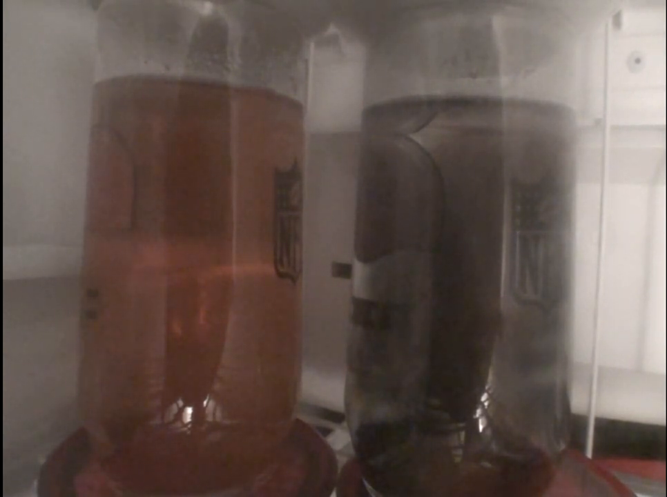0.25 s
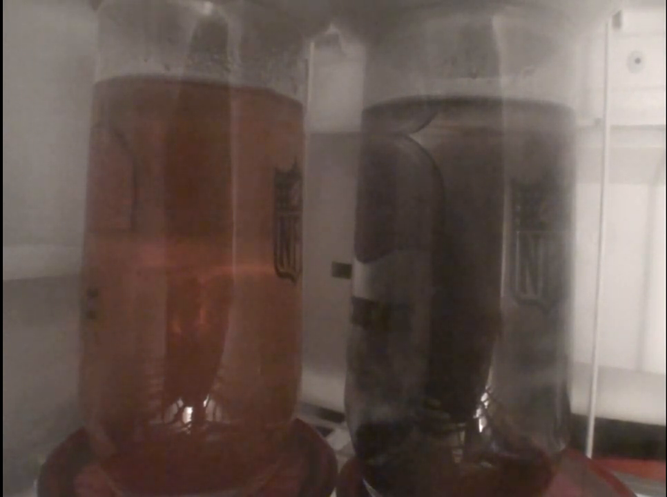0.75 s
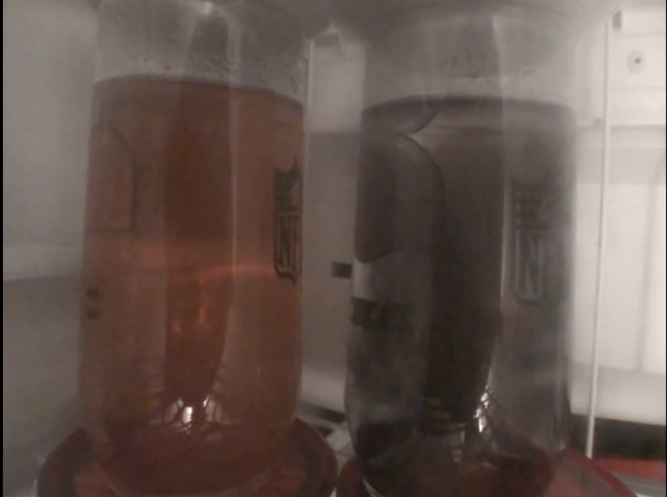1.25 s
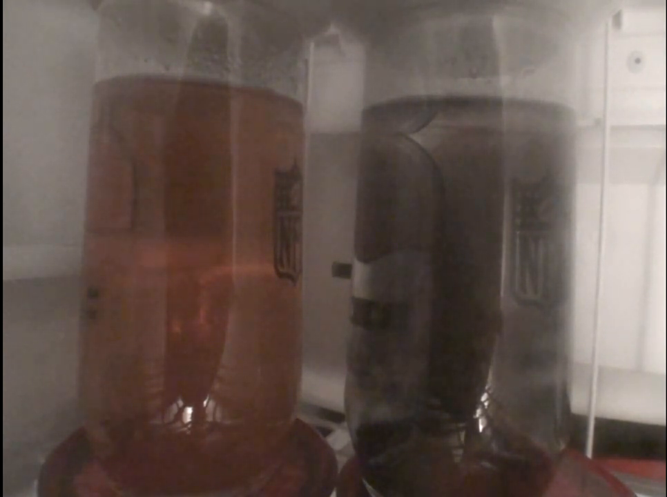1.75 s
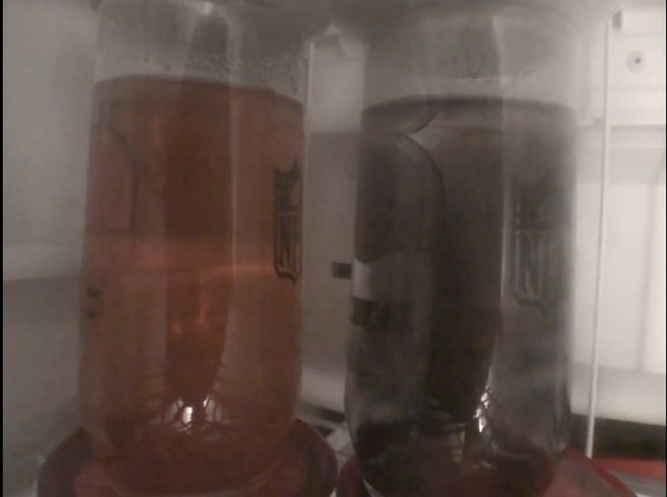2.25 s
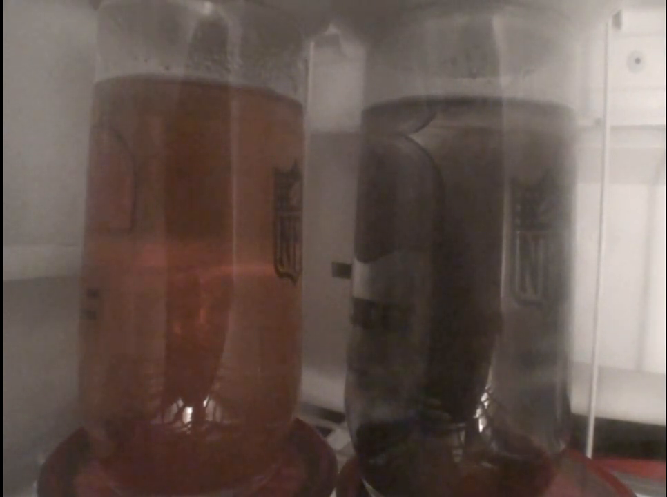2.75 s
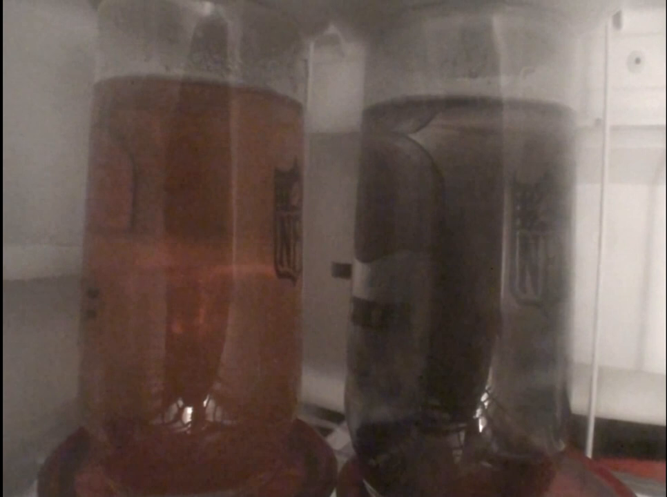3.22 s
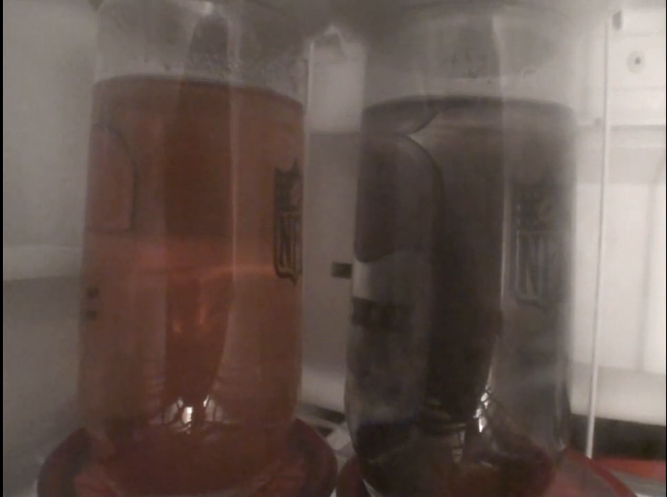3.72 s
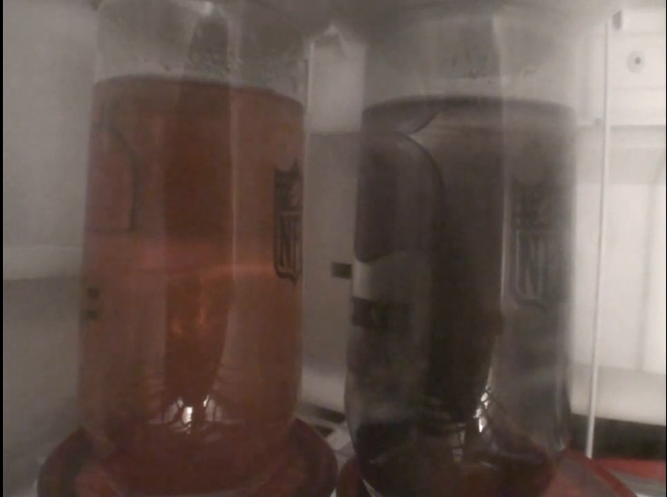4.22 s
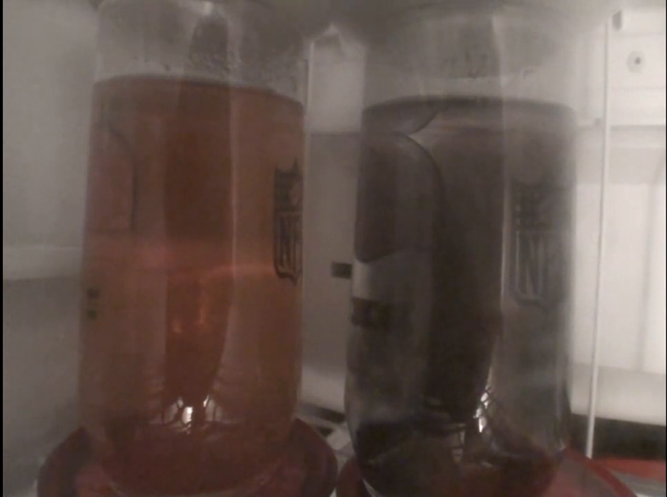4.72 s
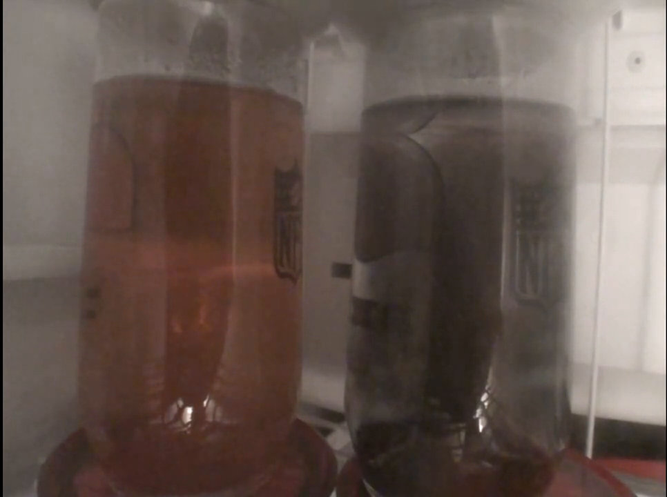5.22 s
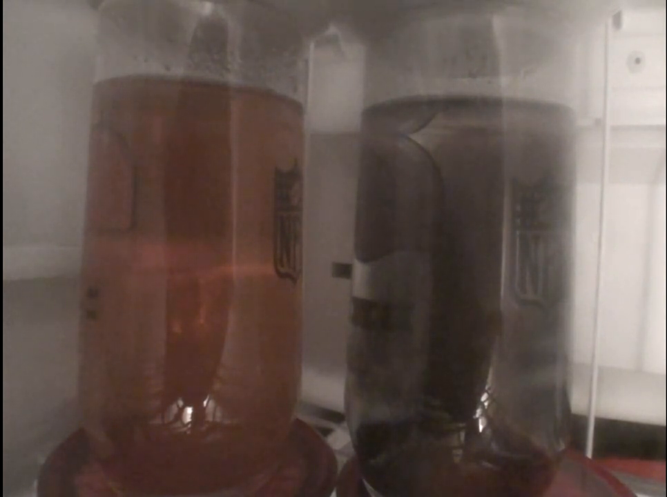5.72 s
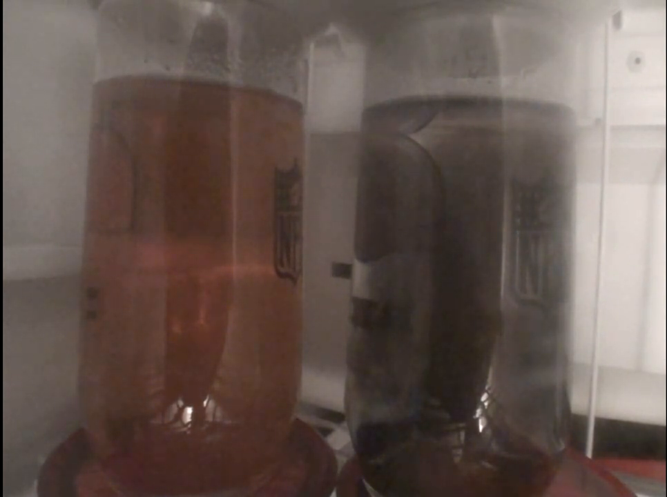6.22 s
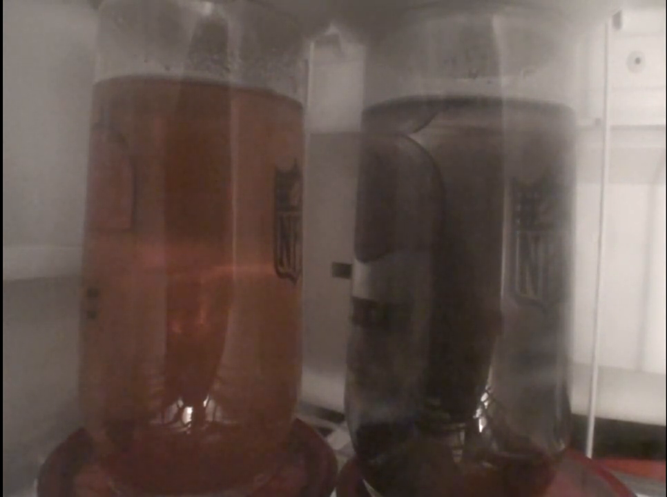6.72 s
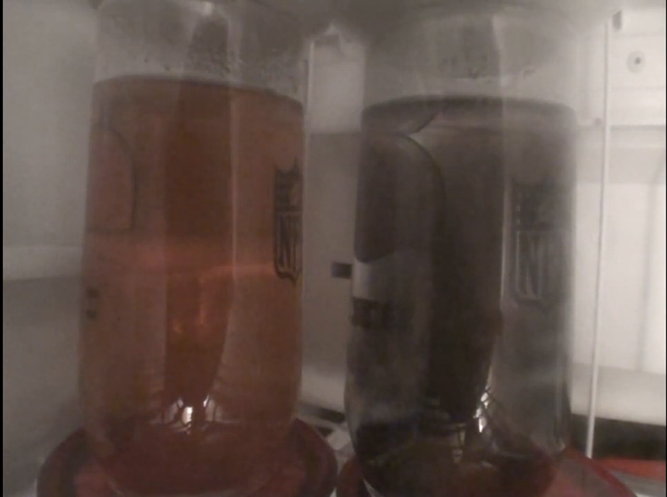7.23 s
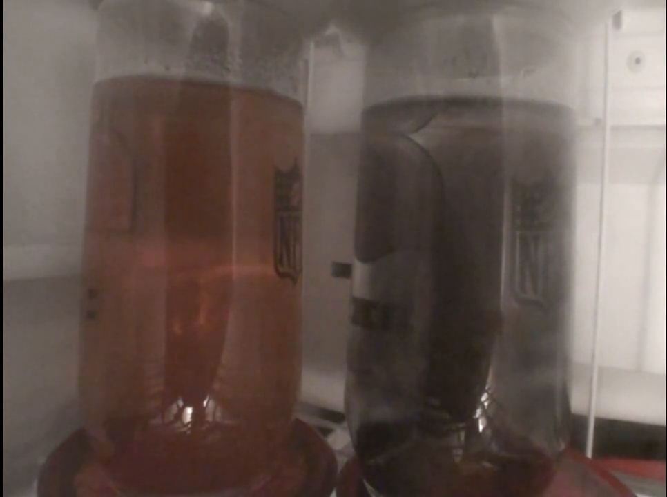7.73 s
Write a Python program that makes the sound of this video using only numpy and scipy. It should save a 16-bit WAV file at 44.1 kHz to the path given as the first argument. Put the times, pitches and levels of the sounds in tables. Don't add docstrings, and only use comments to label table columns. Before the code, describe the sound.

A running freezer heard from inside: a strong low fan hum with a slow throb, over steady rushing air and uneven deep rumble.

```python
import sys
import numpy as np
from scipy import signal
from scipy.fft import rfft, irfft, next_fast_len
from scipy.io import wavfile
from scipy.ndimage import uniform_filter1d

SR = 44100
rng = np.random.default_rng(int(sys.argv[2]) if len(sys.argv) > 2 else 0)


def digitize_waveform(pressure):
    field = np.atleast_2d(pressure).T
    bounded = np.clip(field, -1, 1)
    quanta = np.round(bounded * 32767).astype(np.int16)
    wavfile.write(sys.argv[1], SR, quanta)


def rack_gain(trim_db):
    fader = np.asarray(trim_db, float)
    return 10 ** (fader / 20)


N = 351477
TIME_S = np.arange(N) / SR
COARSE_S = np.arange(0, N + 256, 256) / SR

SHAFT_HZ, BLADES = 49.274, 3
SHAFT_ORDERS = (1, 3, 6, 9, 12)
# left level/dB rms, right level/dB rms, right port lead/rad
FAN_TONES = [(-42, -42.3, -.2), (-16.1, -18.9, 0), (-32, -38.5, .54), (-53, -48, 1.2), (-53, -51, .7)]
PANEL_BEAT_HZ, PANEL_SHARE, PANEL_PEAK_S = .66, .28, .7

MOTOR_HZ = 52.807
# left level/dB rms, right level/dB rms
MOTOR_LEVELS = (-31.7, -32.1)

# f/Hz, level/dB per Hz
AIR_SPECTRUM = [(12, -56.9), (35, -53.0), (60, -46.9), (100, -29.8), (230, -33.9), (330, -50.5),
                (900, -46.6), (1500, -68.0), (2300, -49.7), (2900, -89.5), (4500, -74.4), (6500, -95.8),
                (8800, -112.2), (12800, -119.1)]
# f/Hz, width/Hz, left level/dB, right level/dB
CABINET_MODES = [(13, 7, 0.1, 2.6), (83, 41, -4.7, -5.2), (141, 22, -4.4, -6.4), (168, 16, -6.2, -7.2),
                 (186, 10, -2.4, -1.7), (247, 122, -4.6, -9.1), (285, 19, 3.1, 2.2), (303, 22, 4.3, -3.2),
                 (330, 16, -1.1, 1.5), (400, 27, -2.9, -8.0), (425, 30, -4.9, -3.9), (445, 34, -1.4, 5.0),
                 (508, 94, -8.7, -5.1), (567, 41, -11.0, -3.7), (640, 43, -8.6, -7.3),
                 (734, 50, -2.8, -1.8), (853, 49, -1.7, -2.8), (946, 96, -2.0, -8.9),
                 (1001, 171, -11.4, -2.9), (1090, 58, 5.0, 2.0), (1151, 64, 1.5, -8.8),
                 (1184, 46, -8.6, -0.3), (1323, 49, 2.6, 4.1)]
# f/Hz, width/Hz, left level/dB, right level/dB
SHROUD_MODES = [(1447, 78, 7.4, -4.2), (1574, 150, 5.3, 6.5), (1759, 106, -5.7, 1.3),
                (1826, 102, -1.5, 4.2), (1969, 82, -1.0, -3.2), (2290, 139, -11.8, -9.4),
                (2477, 175, -9.1, -7.7), (2866, 146, 0.7, 5.9), (3061, 167, 5.2, 2.7), (3336, 84, 4.0, 1.4),
                (3413, 105, 1.9, -4.3), (3626, 676, 14.4, 14.3), (3700, 180, -6.9, -0.8),
                (4190, 120, -3.2, -2.3), (4577, 166, 3.0, -2.2), (4625, 656, -8.0, -7.5),
                (5504, 784, -5.2, -9.5), (6070, 433, 2.6, 4.0), (6599, 275, 3.6, 3.4),
                (7002, 632, -1.9, -3.8), (7601, 1000, 7.5, 8.0), (8563, 1365, 4.9, 7.3),
                (10640, 1779, 1.3, 2.6)]
# f/Hz, width/Hz, left level/dB, right level/dB
JAR_MODES = [(153, 22, 0.5, -3.5), (446, 31, -1.5, -1), (600, 9, 2.5, 2), (565, 25, -2, -1),
             (637, 20, -2, -2), (701, 6.3, 1, 2), (1190, 17, -4.5, -0.5), (2121, 24, -0.5, -1),
             (2380, 42, -1, 0.5), (2440, 40, -2.5, -2.5), (3900, 540, 1.5, 1), (4800, 130, 3.5, 5),
             (4940, 120, -2, -4.5), (5990, 150, 2.5, 3.5)]

PORT_LAG = 5
# f/Hz, likeness/0-1
PORT_LIKENESS = [(15, .965), (45, .995), (110, 1), (220, .997), (750, .995), (1300, .92), (2300, .9),
                 (3500, .65), (5200, .78), (7500, .55), (8500, .22), (13000, .1)]
# f/Hz, width/Hz, likeness lost/0-1, right port lead/rad
PORT_NODES = [(168, 16, .03, 0), (250, 50, .08, .2), (330, 85, .42, 1.4), (420, 90, .3, 1.3),
              (520, 130, .1, .7), (600, 60, .05, .4), (636, 36, .75, 0), (655, 45, 0, -1.1),
              (990, 130, .26, -.4), (1172, 55, .55, 1.5), (1330, 200, .15, -.3), (1478, 70, .9, 0),
              (1530, 90, .1, 1.8), (1630, 200, .3, 1.4), (1750, 150, .8, 2.0), (2025, 190, .9, 0),
              (2200, 300, 0, -.9), (2520, 200, .65, -.6), (2800, 400, .45, .6), (3220, 150, .85, .5),
              (3500, 200, .4, 1.1), (4100, 300, .3, 1.3), (4400, 800, .7, -.6), (5550, 450, .9, .6),
              (5950, 500, .3, 1.2), (6500, 900, .8, -.8), (7500, 1200, 0, 1.2)]
# f/Hz, right port lead/rad
BASS_LEAD = [(15, -.33), (40, -.24), (100, -.14), (200, -0.13), (250, -0.17)]

# t/s, rumble level change/dB
EDDY_PASSES = [(.15, -5), (.4, 5.5), (1.3, -7), (1.64, 1), (2.0, -1.5), (2.53, 2.5), (2.8, 6), (3.23, -6),
               (3.74, 4), (4.28, 5.5), (4.54, -7), (4.66, 8.5), (4.95, 5), (5.71, -5), (5.87, 7),
               (6.03, -2.5), (6.13, 1), (6.39, 6), (6.55, 7.5), (7.54, 6.5)]
RUMBLE_DB, PASS_S = -19.5, 0.06


def read(points, hz):
    f, value = np.transpose(points)
    return np.interp(np.log(hz + 1), np.log(f + 1), value)


def bell(hz, centre_hz, width_hz):
    return 1 / (1 + (2 * (hz - centre_hz) / width_hz) ** 2)


def drift(top_hz):
    slow = np.zeros(len(COARSE_S))
    for f in top_hz * np.geomspace(.1, 1, num=16):
        slow += np.sin(2 * np.pi * (f * COARSE_S + rng.random())) / np.sqrt(f)
    return np.interp(TIME_S, COARSE_S, slow / slow.std())


def shaft_angle(slip_rad=0.1):
    return 2 * np.pi * SHAFT_HZ * TIME_S + slip_rad * drift(1.2)


def blades(angle):
    out = np.zeros((2, N))
    beat = 2 * np.pi * PANEL_BEAT_HZ * (TIME_S - PANEL_PEAK_S)
    for order, (left_db, right_db, lead) in zip(SHAFT_ORDERS, FAN_TONES):
        turn = order * angle + 2 * np.pi * rng.random() + np.array([[0], [lead]])
        swell = rack_gain(0.22 * drift(3.5))
        tone = np.cos(turn)
        if order == BLADES:
            tone = tone + PANEL_SHARE * np.cos(turn + beat)
        level = rack_gain(np.array([[left_db], [right_db]]))
        out += np.sqrt(2) * swell * level * tone
    return out


def motor():
    turn = 2 * np.pi * MOTOR_HZ * TIME_S + .15 * drift(0.6)
    lead = np.array([[0], [-.12]])
    level = rack_gain(np.array(MOTOR_LEVELS))[:, None]
    return np.sqrt(2) * level * np.cos(turn + lead)


def air(angle, chop=.14, gust_db=.3):
    size = next_fast_len(N)
    hz = np.fft.rfftfreq(size, 1 / SR)
    eddies = rng.standard_normal((2, N)) * rack_gain(gust_db * drift(6.5))
    chopped = eddies * chop * np.cos(BLADES * angle)
    near, stray = rfft(eddies, size) + bell(hz, 2100, 1500) * rfft(chopped, size)

    alike = read(PORT_LIKENESS, hz)
    lead = 2 * np.pi * hz * PORT_LAG / SR + read(BASS_LEAD, hz)
    for node_hz, width_hz, lost, turn in PORT_NODES:
        close = bell(hz, node_hz, width_hz) ** 2
        alike = alike * (1 - lost * close)
        lead = lead + turn * close
    right = (alike * near + np.sqrt(1 - alike ** 2) * stray) * np.exp(1j * lead)
    ports = np.array([near, right])

    colour_db = read(AIR_SPECTRUM, hz)
    for f, width_hz, *port_db in CABINET_MODES + SHROUD_MODES + JAR_MODES:
        colour_db = colour_db + np.outer(port_db, bell(hz, f, width_hz))
    coloured = ports * rack_gain(colour_db) * np.sqrt(SR / 2) * (hz > 8)
    return irfft(coloured, size)[:, :N]


def surge(ports, smooth_s=0.21, grip=.8):
    hz = np.fft.rfftfreq(N, 1 / SR)
    band = np.exp(-(np.log(hz / 100 + 1e-9) / 0.36) ** 4)
    rumble = irfft(rfft(ports) * band, N)
    span = int(smooth_s * SR)
    power = uniform_filter1d(uniform_filter1d(rumble.mean(0) ** 2, span), span)
    swell_db = sum(db * np.exp(-((COARSE_S - s) / PASS_S) ** 2) for s, db in EDDY_PASSES)
    wanted_db = RUMBLE_DB + np.interp(TIME_S, COARSE_S, swell_db)
    change_db = wanted_db - 10 * np.log10(power + 1e-9)
    return ports + rumble * (rack_gain(grip * np.clip(change_db, -9, 9)) - 1)


def scene():
    angle = shaft_angle()
    return blades(angle) + motor() + surge(air(angle))


def top_cut(x):
    return signal.sosfilt(signal.butter(12, 12900, fs=SR, output="sos"), x)


def record(dry, gain_db=0.5):
    knee = 1.4
    rounded = knee * np.tanh(rack_gain(gain_db) * dry / knee)
    edge = np.minimum(np.arange(N) + 20, np.arange(N)[::-1] + 10)
    fade = np.sin(np.pi / 2 * np.minimum(edge / 60, 1)) ** 2
    return top_cut(rounded * fade)


dry = scene()
out = record(dry)
digitize_waveform(out)
```